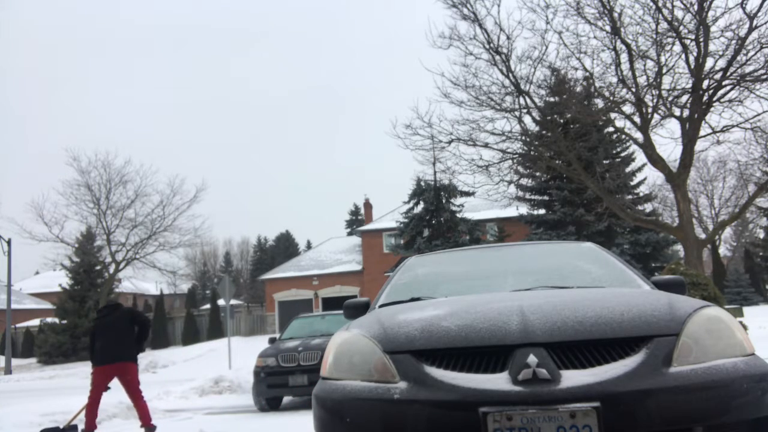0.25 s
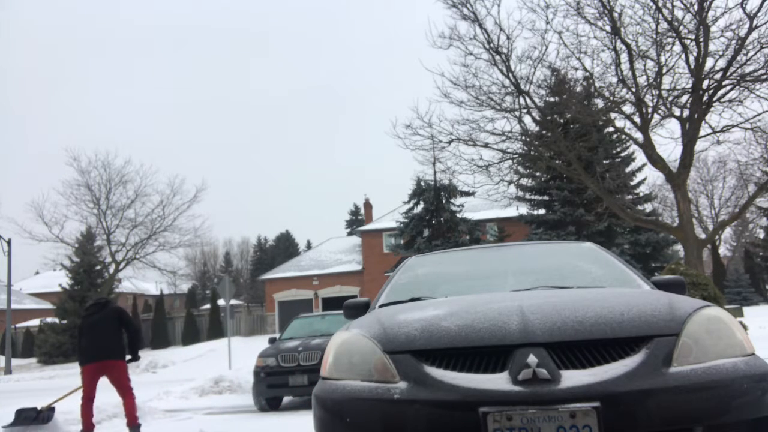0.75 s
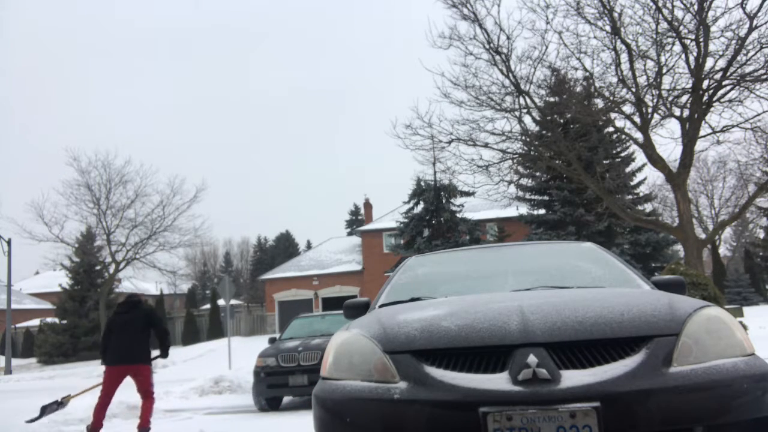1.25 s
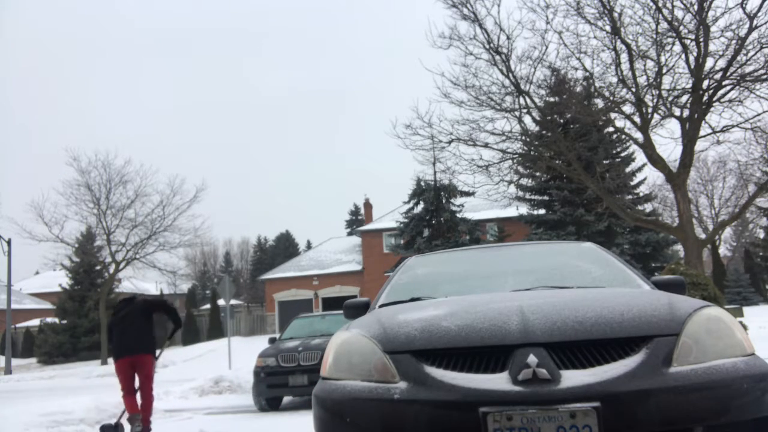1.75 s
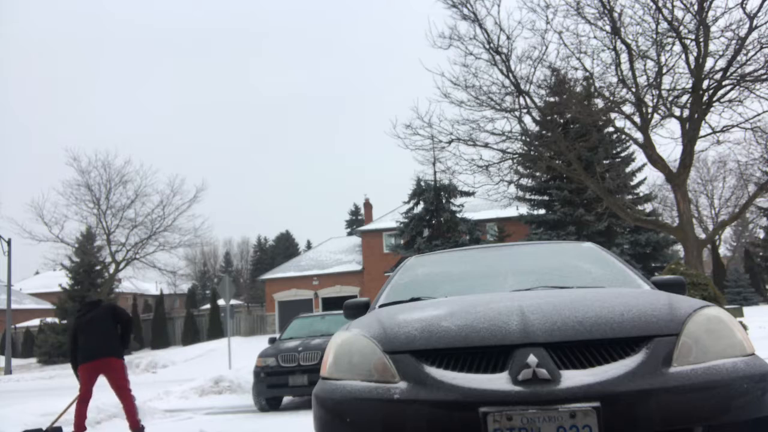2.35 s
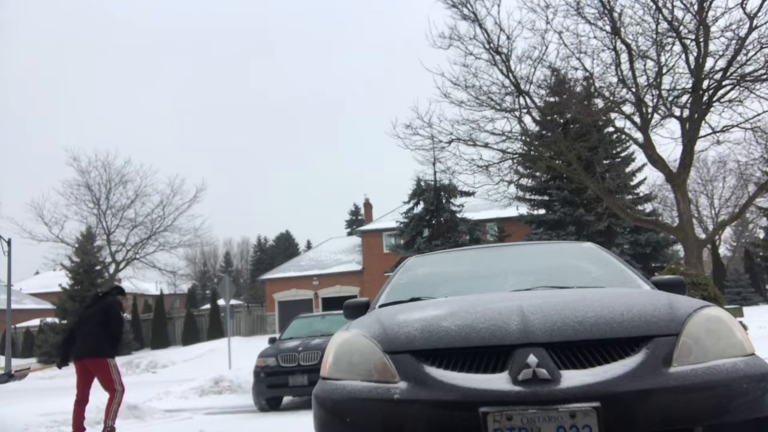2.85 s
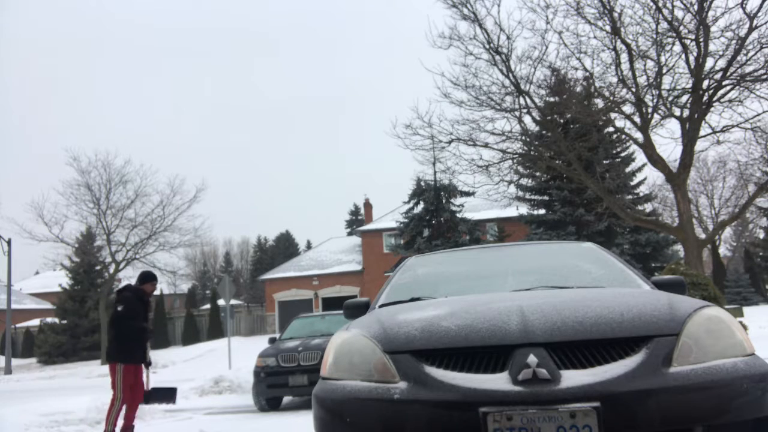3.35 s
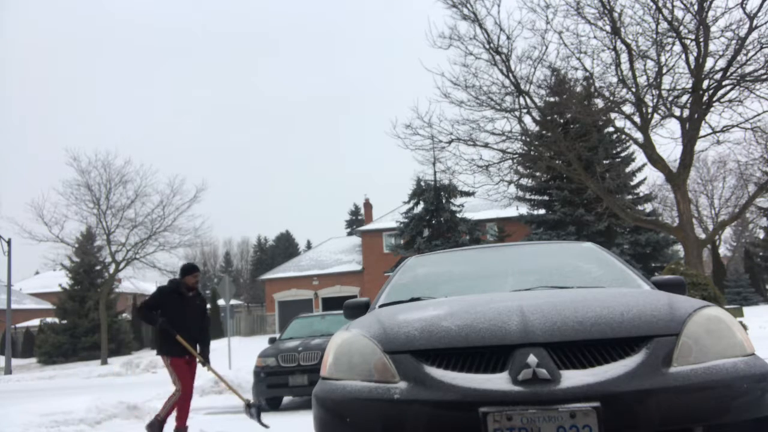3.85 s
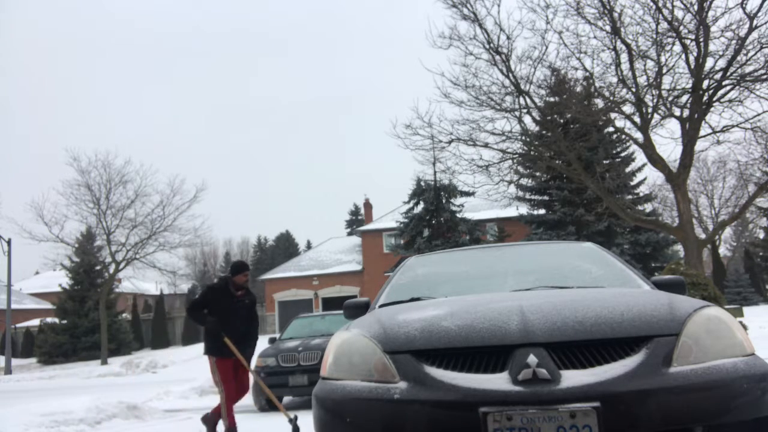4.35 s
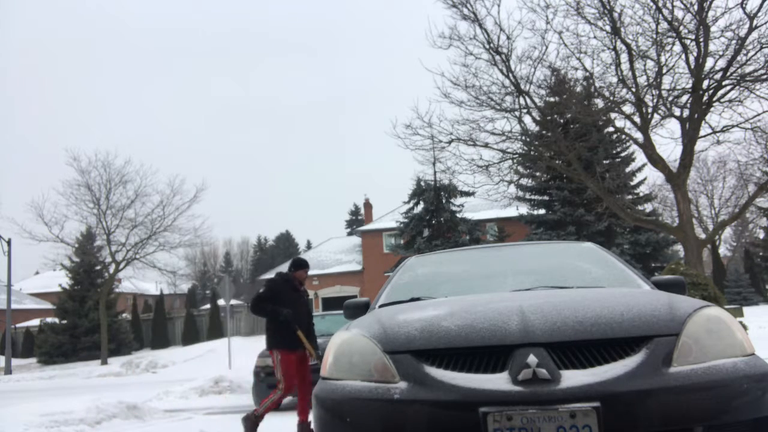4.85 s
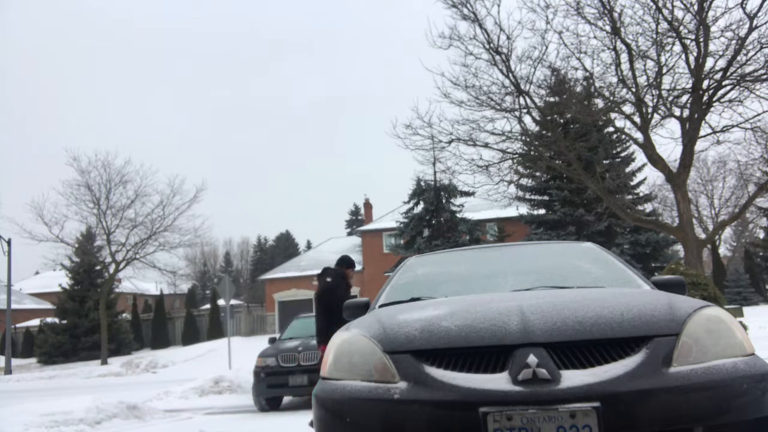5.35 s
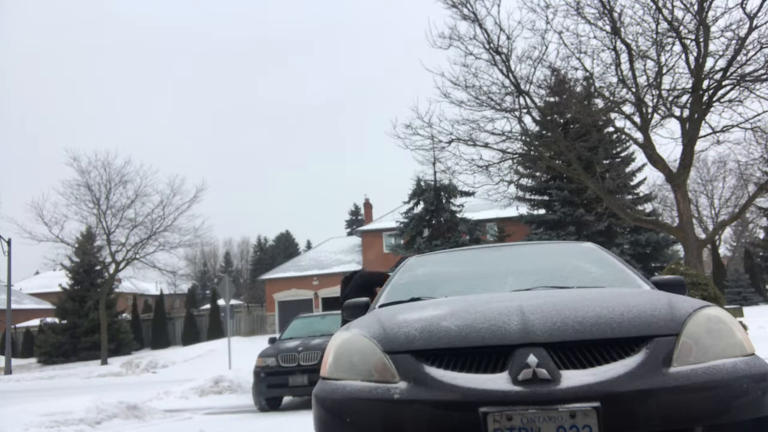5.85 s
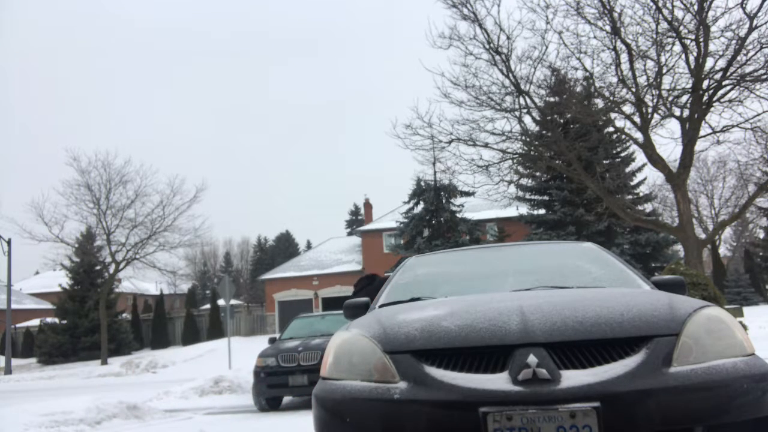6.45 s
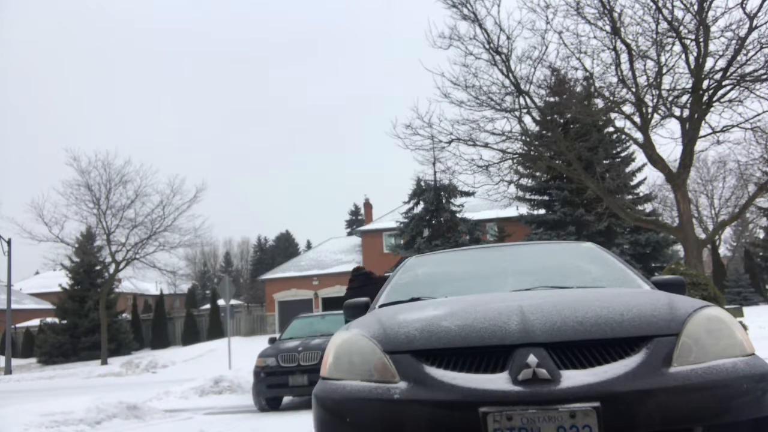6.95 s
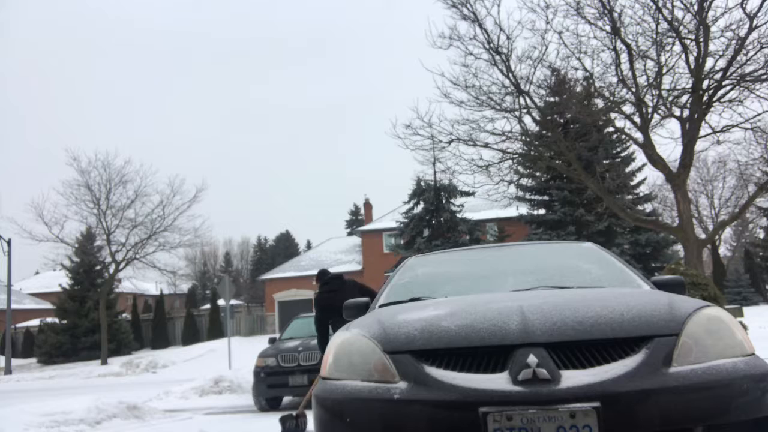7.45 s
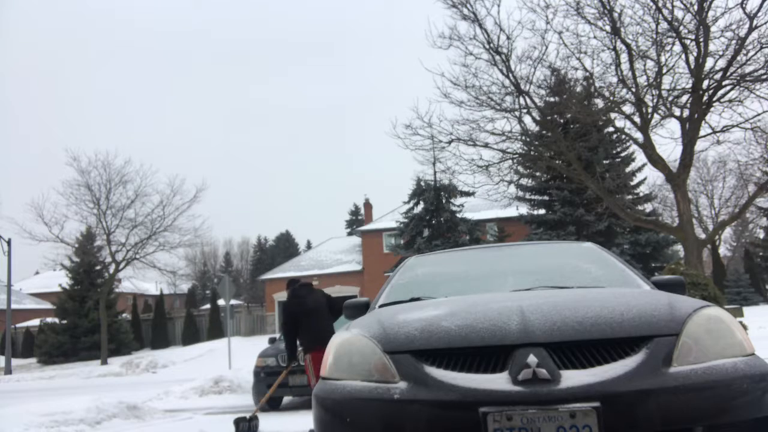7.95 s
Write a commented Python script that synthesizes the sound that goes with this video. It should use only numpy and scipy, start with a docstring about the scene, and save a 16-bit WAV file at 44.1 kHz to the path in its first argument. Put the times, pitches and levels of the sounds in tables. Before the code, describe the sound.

A snow shovel knocks hard on the ground, and loose snow swishes softly. One gritty scrape over ice follows, ending in another hard knock. After a lull, a run of pushes crunches through ice pellets and packed snow, the edge catching, ringing thinly and groaning, with light knocks and soft boot thuds. It is heard from several metres away on an open driveway, over faint traffic rumble.

```python
"""A hard knock, then the gritty scrape of a snow shovel pushed over ice pellets and packed snow.
Several metres away, its edge crushes grains and sets the scoop ringing; it catches on ridges,
sings over bare ice, groans over snow and knocks hard once more. Loose snow slides off, a jacket
swishes and boots thud softly, over the low rumble of a winter suburb."""
import sys
import numpy as np
from scipy import signal
from scipy.fft import rfft, irfft
from scipy.io import wavfile

SR = 44100
rng = np.random.default_rng(int(sys.argv[2]) if len(sys.argv) > 2 else 0)


def dump_mix(stems):
    """Bounce the given channels to the path in sys.argv[1] as a 16-bit WAV at rate SR."""
    frames = np.atleast_2d(stems).T  # one column per channel
    limited = np.clip(frames, -1, 1)  # hard clip at full scale
    pcm = np.round(limited * 32767).astype(np.int16)
    wavfile.write(sys.argv[1], SR, pcm)


N = 362502
T = np.arange(N) / SR
HZ = np.fft.rfftfreq(N, 1 / SR)


def amp(db):
    """Decibels to gain."""
    return 10 ** (np.asarray(db) / 20)


def unit(x):
    """Scales to rms 1."""
    return x / np.sqrt(np.mean(x ** 2) + 1e-20)


def curve(points, hz):
    """Reads a table of (Hz, value) on a log-frequency axis."""
    freqs, values = np.transpose(points)
    return np.interp(np.log(hz + 1), np.log(freqs), values)


def add(mix, start_s, sound):
    """Mixes a sound in at the given time."""
    part = mix[max(round(start_s * SR), 0):][:len(sound)]
    part += sound[:len(part)]


def colour(x, gain):
    """Minimum-phase EQ shaped like gain, its peak at unity: resonances ring after the blow."""
    cepstrum = irfft(np.log(np.maximum(gain / gain.max(), amp(-100))), N)
    cepstrum[1:N // 2] *= 2
    cepstrum[N // 2 + 1:] = 0
    response = irfft(np.exp(rfft(cepstrum)), N)[:SR // 5]
    return signal.oaconvolve(x, response)[:N]


def band(lo_hz, hi_hz, order=6):
    """Gain of a band with soft edges."""
    return ((1 + (lo_hz / (HZ + 1)) ** (2 * order)) * (1 + (HZ / hi_hz) ** (2 * order))) ** -.5


def noise(gain):
    """Noise of rms 1 with the given spectrum."""
    return unit(irfft(rfft(rng.standard_normal(N)) * gain, N))


def wander(rate_hz):
    """Random modulation of rms 1, up to about the given rate."""
    return noise(band(rate_hz / 10, rate_hz, order=2))


def grains(per_s, spread_db):
    """Clicks of breaking pellets: many small, a few large."""
    size = amp(spread_db * np.minimum(rng.exponential(1, N), 5))
    return unit(size * rng.choice([-1, 1], N) * (rng.random(N) < per_s / SR))


# Tone of the distant traffic. Each row: frequency in Hz, relative level in dB.
TOWN_SPECTRUM = [(15, -31), (25, -9), (79, -6), (178, -13.5), (215, -9.5), (349, -16.5), (433, -19.5),
                 (482, -19.5), (523, -19.5), (648, -23), (895, -23.5), (1530, -29.5), (2230, -35),
                 (5730, -41.5), (15500, -49.5)]
# How the traffic's midrange wash drifts. Each row: time in seconds, gain in dB.
WASH_DRIFT = [(0, 0), (1.2, -1), (3.2, -2.5), (4.2, -2.5), (7, -3), (8.2, 4)]
# Hum of a far engine. Each row: pitch in Hz, width in Hz, level in dB.
ENGINE_HUM = [(54.6, 16, -65.5), (121.3, 15, -69.5)]

def town():
    """The bed: rumble, a far engine and a faint wash of traffic that drifts."""
    traffic = noise(amp(curve(TOWN_SPECTRUM, HZ)) * band(46.4, 20000, order=4))
    wash = irfft(rfft(traffic) * band(320, 2700, order=2), N)
    drift = amp(np.interp(T, *np.transpose(WASH_DRIFT)))
    engine = sum(amp(db) * noise(1 / (1 + (2 * (HZ - hz) / width) ** 2)) for hz, width, db in ENGINE_HUM)
    return amp(-58) * (traffic + (drift - 1) * wash) + engine


# Decay of the yard's reverb. Each row: frequency in Hz, t60 in seconds.
YARD_DECAY = [(150, 0.67), (400, 0.34), (1000, 0.52), (1400, 0.41), (2200, 0.18), (6000, 0.45),
              (15000, 0.09)]

def scatter():
    """Sparse returns from houses and trees, energy 1; snow soaks up the treble."""
    taps = rng.standard_normal(SR) * (rng.random(SR) < 3000 / SR)
    fade_in = np.clip(T[:SR] / 0.013, 0, 1)
    hz, age, spectra = signal.stft(taps * fade_in, SR, nperseg=256)
    decay = amp(-60 * age / curve(YARD_DECAY, hz)[:, None])
    tail = signal.istft(spectra * decay, SR, nperseg=256)[1][:SR]
    return tail / np.linalg.norm(tail)


# Slaps off the parked cars and the house front. Each row: delay in seconds, relative level in dB.
SLAPS = [(.0095, -23.5), (0.027, -29)]

def yard(x, echo_db, tail_db):
    """Adds two near echoes and a scatter that changes as the shovel moves about."""
    wet, angle = np.zeros(N), 2 * np.pi * 0.595 * T
    for crossfade in (np.cos(angle), np.sin(angle)):
        wet += amp(tail_db) * signal.oaconvolve(x * crossfade, scatter())[:N]
    for delay, db in SLAPS:
        add(wet, delay, amp(db + echo_db) * x)
    return x + signal.sosfilt(signal.butter(1, 3500, fs=SR, output="sos"), wet)


# Tone of loose snow and cloth. Each row: frequency in Hz, relative level in dB.
SWISH_SPECTRUM = [(300, 7.5), (1000, 4), (3600, -3), (7000, -14.5), (15600, -34.5)]
# Sliding snow and jacket swishes. Each row: centre in seconds, half length in seconds, level in dB,
# top-end sparkle in dB, low cut in Hz, ground echo lag in ms, echo share from 0 to 1.
SWISH_CUES = [(0.73, 0.047, -63, 25.5, 600, 0.028, 0), (1.034, 0.12, -65, 3, 500, 0.17, 0.35),
              (1.16, 0.043, -61.5, 16, 750, 0.28, 0.6), (2.555, 0.033, -62.5, 3, 800, 0.35, 0.04),
              (2.678, 0.058, -63.5, 20.5, 610, 0.23, 0.26), (2.944, 0.032, -59.5, 14, 2270, 0.37, 0.1),
              (3.688, 0.062, -64, 8, 2080, 0.87, 0.5)]

def swishes():
    """Soft swells of fine grains; the dull echo off the snow combs each one by its height."""
    out, fine = np.zeros(N), rfft(grains(per_s=12000, spread_db=3.5))
    for centre, half, db, sparkle_db, low_cut_hz, lag_ms, share in SWISH_CUES:
        comb = 1 + share * band(1, 7000, order=1) * np.exp(-2j * np.pi * HZ * lag_ms / 1000)
        tone = amp(curve(SWISH_SPECTRUM, HZ) + sparkle_db * band(10000, 20000))
        tone *= band(low_cut_hz, 20000, order=4)
        swell = np.exp(-((T - centre) / half / 1.73) ** 2)
        out += amp(db) * swell * unit(irfft(fine * tone * comb, N))
    return out


def bursts(cues, tone, rise_s, decay_s):
    """A short shower of fractures on each cue."""
    t, envelope = T[:SR // 4], np.zeros(N)
    shape = (1 - np.exp(-t / rise_s)) * np.exp(-t / decay_s)
    for time, db in cues:
        add(envelope, time - rise_s, amp(db) * shape / shape.max())
    return envelope * unit(colour(grains(per_s=9000, spread_db=4), tone))


# Boots press into the snow. Each row: time in seconds, relative level in dB.
BOOT_CUES = [(4.70, -52), (4.745, -48), (4.825, -48.5), (5.6, -55), (5.775, -59), (5.84, -48), (6.115, -49)]

def boots():
    """Dull thuds of snow packing under the heel."""
    return amp(-3) * bursts(BOOT_CUES, band(117, 145, order=3), rise_s=0.014, decay_s=0.016)


# Loose chips of ice land. Each row: time in seconds, relative level in dB.
CHIP_CUES = [(0.132, -44.5), (2.4675, -42), (2.4942, -47), (2.5252, -54), (2.577, -42.5), (3.8277, -56.5)]

def chips():
    """Freed chips tick on the crust, with the tone of loose snow."""
    return amp(-4) * bursts(CHIP_CUES, amp(curve(SWISH_SPECTRUM, HZ)), rise_s=0.00061, decay_s=0.0047)


# The scoop chatters over packed snow.
# Each row: centre in seconds, half length in seconds, pitch in Hz, level in dB.
GROAN_CUES = [(4.56, 0.13, 299.7, -61), (4.95, .18, 312.6, -63.5), (5.385, 0.065, 315, -53.5),
              (5.7, 0.29, 345, -63.5), (6.18, 0.26, 373, -56.5)]

def groans():
    """Uneven slips keep one low bending mode ringing; the load of snow sets its pitch."""
    out = np.zeros(N)
    swing = wander(rate_hz=21) + 1j * wander(rate_hz=81)
    for centre, half, hz, db in GROAN_CUES:
        ring = (swing * np.exp(2j * np.pi * hz * T)).real
        out += amp(db) * np.exp(-((T - centre) / half) ** 4) * ring
    return out


# The edge sings over bare ice.
# Each row: centre in seconds, rough half length in seconds, pitch in Hz, level in dB.
SKID_CUES = [(0.042, 0.018, 1560, -56), (2.028, 0.09, 2250, -50), (2.14, 0.14, 1058, -49.5),
             (1.854, 0.017, 521, -55), (2.12, 0.11, 1460, -55), (4.411, 0.027, 1965, -54),
             (4.72, 0.16, 1864, -55.5), (5.017, 0.082, 1057, -55), (5.226, 0.023, 2310, -55.5),
             (5.954, 0.054, 1688, -58), (6.577, 0.061, 1052, -56), (6.66, .05, 1536, -60),
             (7.33, 0.043, 1223, -54), (8.02, 0.21, 790, -60)]

def skids():
    """Rapid slips feed one mode of the edge: a narrow, fuzzy ring that swells and fades."""
    out = np.zeros(N)
    swing = wander(rate_hz=66) + 1j * wander(rate_hz=49)
    for centre, half, hz, db in SKID_CUES:
        ring = (np.roll(swing, rng.integers(N)) * np.exp(2j * np.pi * hz * T)).real
        out += amp(db) * np.exp(-((T - centre) / half / 1.2) ** 4) * ring
    return out


# Tone of the edge on ice. Each row: frequency in Hz, relative level in dB.
GRIND_SPECTRUM = [(130, -28), (200, -4.5), (340, 6), (590, -7), (1000, -0.5), (1230, -0.5), (1335, -4),
                  (1440, 0.5), (2250, -3.5), (2900, -6.5), (4400, -8.5), (7600, -18.5), (12000, -11.5),
                  (15600, -14.5)]
# Modes of the scoop. Each row: pitch in Hz, t60 in seconds, relative level when struck in dB,
# boost or cut when rubbed in dB.
SCOOP_MODES = [(320, 0.029, -57, -3.5), (435, 0.074, -15, -5), (528, 0.089, -13.5, 4.5),
               (604, 0.04, -10.5, 3), (725, 0.042, -6, 6), (799, 0.074, -9.5, 8), (878, 0.058, -4, -1),
               (1009, 0.042, -7, 5), (1078, 0.077, -14, 5), (1143, 0.058, -8.5, 5), (1246, 0.11, -21, 8.5),
               (1434, 0.034, -16, 5), (1898, 0.065, -36, 1.5), (2220, 0.14, -26, -4.5),
               (2720, 0.068, -28, 6.5), (3800, 0.044, -30, 4), (4680, 0.06, -32, -2)]

def rubbed_scoop():
    """EQ from edge to air: the grinding spectrum with a peak or dip at each mode."""
    modes_db = sum(db / (1 + ((HZ - hz) * t60) ** 2) for hz, t60, _, db in SCOOP_MODES)
    return amp(curve(GRIND_SPECTRUM, HZ) + modes_db)


def struck_scoop(t):
    """All modes ring at once; the edge sinks into snow, which stops most of the swing."""
    ring = sum(amp(db - 60 * t / t60) * np.sin(2 * np.pi * hz * t) for hz, t60, db, _ in SCOOP_MODES)
    choke = amp(-11.5) + np.exp(-t / 0.0076) * (1 - np.exp(-t / 0.0012))
    return ring * choke


# Blows on the scoop; a load of snow lowers and damps the thump. Each row: start in seconds, clatter
# gain in dB, hardness as a cut-off in Hz, thump gain in dB, thump pitch in Hz, thump t60 in seconds.
KNOCK_CUES = [(0.079, -16, 1470, -6, 334, 0.013), (1.167, -42.5, 900, -35.5, 254, 0.026),
              (1.209, -43, 850, -43, 233, 0.089), (2.404, -12, 744, -20, 387, 0.041),
              (2.584, -34, 643, -35.5, 480, 0.031), (5.36, -42, 1290, -41, 300, 0.11),
              (5.826, -56, 700, -35.5, 330, 0.077), (5.835, -47, 700, -39, 292.7, 0.044),
              (6.075, -36, 700, -40.5, 370, .06), (6.326, -37, 1696, -39, 355, 0.048),
              (6.375, -37, 900, -37, 345, 0.045), (7.39, -34, 1300, -33.5, 333, 0.055),
              (7.438, -54, 700, -39, 335, .07)]

def knocks():
    """Each blow bends the whole scoop once, a thump, and sets its panels clattering."""
    t, out = T[:SR // 3], np.zeros(N)
    panels = struck_scoop(t)
    for start, clatter_db, hard_hz, thump_db, thump_hz, t60 in KNOCK_CUES:
        clatter = signal.sosfilt(signal.butter(3, hard_hz, fs=SR, output="sos"), panels)
        contact = np.exp(-t / 0.0023)
        crack = amp(-37) * rng.standard_normal(len(t)) * contact
        thump = amp(thump_db - 60 * t / t60) * np.sin(2 * np.pi * thump_hz * t) * (1 - contact)
        add(out, start, amp(clatter_db) * (clatter + crack) + thump)
    # a small scoop radiates little bass
    return signal.sosfilt(signal.butter(3, 120, "high", fs=SR, output="sos"), out)


# The edge catches on ridges of ice. Each row: time in seconds, relative level in dB.
CATCH_CUES = [(1.8393, -34.5), (1.9669, -38), (2.097, -37), (2.11, -36), (2.122, -38), (4.392, -49),
              (4.771, -41), (4.8155, -39.5), (5.3613, -42), (6.5694, -40), (7.1448, -38), (7.1786, -39.5),
              (7.377, -36.5), (7.3886, -41.5), (7.4385, -41), (7.502, -41), (7.5577, -34.5),
              (7.6914, -40.5), (7.9165, -39), (8.029, -42.5), (8.088, -36)]

def catches():
    """Ridges give way under the edge and jolt the scoop."""
    tone = rubbed_scoop() * (band(710, 5100, order=3) + amp(-10.5) * band(3600, 17000))
    return amp(-6.5) * bursts(CATCH_CUES, tone, rise_s=0.0047, decay_s=0.013)


# Pushes of the shovel. Each row: start, length and bite time in seconds, crest as a share of the
# length, relative grind level at the crest in dB, effort's swell before and easing after it in dB,
# relative judder level in dB, the bent edge's pitch and width in Hz, its boost or cut in dB.
PUSHES = [ (0.0, 0.083, .002, 0.6, -47, 0, 4, -51.5, 2600, 900, 2.5),
          (1.842, 0.59, 0.0022, 0.37, -40, 4, 11.5, -51.5, 2240, 210, 6.5),
          (4.364, 0.085, .003, .6, -48.5, 4.5, 2, -72, 2060, 300, -3),
          (4.5, 1.305, .0015, 0.36, -45.5, 4, 20.5, -56.5, 1680, 50, 7),
          (5.817, .43, 0.023, 0.36, -48.5, 4.5, 21, -52.5, 1660, 60, 4),
          (6.263, 0.67, 0.039, 0.59, -46.5, 6.5, 30, -54.5, 1680, 80, 3),
          (7.138, 0.065, 0.0054, 0.15, -51, -5, 10, -54, 1300, 460, 0),
          (7.226, 0.26, .003, 0.5, -43, 9.5, 5, -51, 1250, 470, 1),
          (7.494, 0.324, .004, 0, -44, -2, 5, -55, 2010, 470, 4.5),
          (7.83, 0.41, .01, .55, -49, 0.5, 0, -60, 2010, 470, 7.5), ]

def pushed(grit, levels_db, follows):
    """Plays one band through every push; its level moves by `follows` dB per dB of effort."""
    out = np.zeros(N)
    for level_db, push in zip(levels_db, PUSHES):
        start, length, bite_s, crest, _, swell_db, ease_db, _, edge_hz, width_hz, edge_db = push
        progress = np.clip((T - start) / length, 0, 1)
        crest = np.clip(crest, .05, .95)
        before = np.maximum(1 - progress / crest, 0)
        after = np.maximum((progress - crest) / (1 - crest), 0)
        effort_db = -swell_db * before ** 1.13 - ease_db * after ** 1.52  # flat crest, steep ends
        bite = np.exp(np.minimum(T - start, 0) / bite_s)
        lift_off = np.exp(-np.maximum(T - start - length, 0) / 0.012)
        edge = signal.lfilter(*signal.iirpeak(edge_hz, edge_hz / width_hz, SR), grit)
        texture = unit(grit + (amp(edge_db) - 1) * edge)
        stroke = amp(level_db + follows * effort_db) * lift_off * texture
        out = (1 - bite) * out + bite * stroke  # each stroke takes over from the last
    return out


# The shovel passes behind a parked car. Each row: time in seconds, loss in the fizz in dB.
CAR_SHADE = [(0, 6), (1.85, -1), (2.3, 0), (4.45, 1.5), (4.8, 2.5), (5.08, 10.5), (6.2, 12), (6.65, 4.5),
             (6.9, 0), (7.38, 5), (7.7, -3), (8.2, -3)]

def scraping():
    """The edge sticks and slips, crushing pellets in clumps; the scoop colours the grains."""
    scoop, slips, lumps = rubbed_scoop(), wander(rate_hz=54), wander(rate_hz=9.8)
    crushing = grains(per_s=14000, spread_db=2.5)
    snapping = grains(per_s=1500, spread_db=0.5)
    grind_db, judder_db = [row[4] for row in PUSHES], [row[7] for row in PUSHES]
    shade_db = np.interp(T, *np.transpose(CAR_SHADE))

    def grit(lo_hz, hi_hz, slip_db, lump_db, snap):
        """One band of breaking grains, roughened by slips and lumps."""
        force = (crushing + snap * snapping) * amp(slip_db * slips + lump_db * lumps)
        return colour(force, scoop * band(lo_hz, hi_hz))

    judder = pushed(grit(163, 610, slip_db=0.5, lump_db=2.6, snap=0.35), judder_db, follows=0.32)
    grind = pushed(grit(527, 2315, slip_db=1.9, lump_db=1.05, snap=0.4), grind_db, follows=0.91)
    crunch = pushed(grit(2643, 7640, slip_db=1.26, lump_db=0.94, snap=0.6), grind_db, follows=0.85)
    fizz = pushed(grit(8150, 19100, slip_db=1.0, lump_db=0.6, snap=0.68), grind_db, follows=0.81)
    crunch *= amp(-6 - 0.43 * shade_db)  # less shaded: longer waves bend round the car
    fizz *= amp(-11 - shade_db)
    return amp(-4.5) * judder + amp(-2.5) * grind + crunch + fizz


def scene():
    """The shovel in the open yard, over the town."""
    strokes = scraping() + groans() + skids() + catches() + chips()
    shovel = yard(strokes, echo_db=-10, tail_db=-10.5) + yard(knocks(), echo_db=-7.5, tail_db=-12.5)
    return (shovel + boots() + swishes() + town())[None]


# Cancellations in the microphone's port. Each row: centre in Hz, width in Hz, gain in dB.
PORT_NOTCHES = [(4900, 240, -5.5), (7620, 1650, -2), (10440, 690, -4)]

def record(dry):
    """The microphone's port notches the treble, then a steep low-pass trims the very top."""
    notches_db = sum(db / (1 + (2 * (HZ - hz) / width) ** 4) for hz, width, db in PORT_NOTCHES)
    heard = colour(dry[0], amp(notches_db))
    low_pass = signal.firwin(1023, cutoff=15780, window=("kaiser", 9), fs=SR)
    return signal.oaconvolve(heard, low_pass, "same")[None]


dry = scene()
out = record(dry)
dump_mix(out)
```